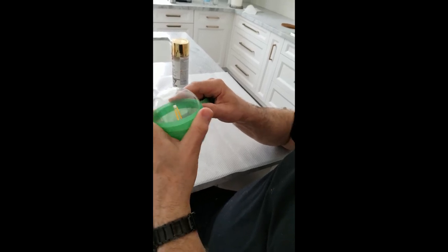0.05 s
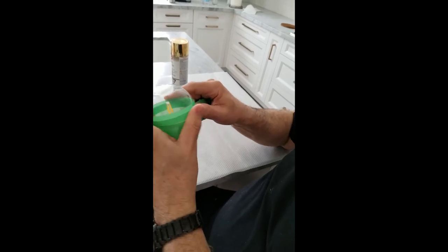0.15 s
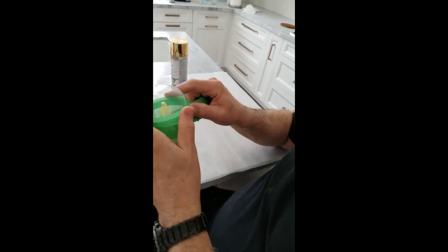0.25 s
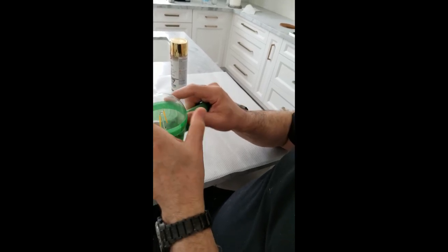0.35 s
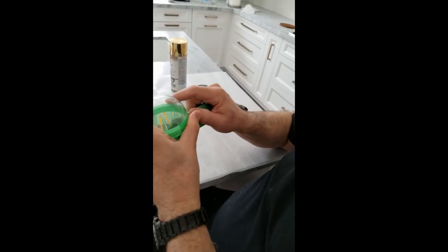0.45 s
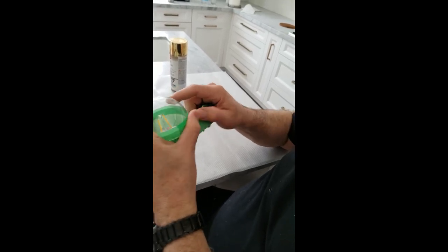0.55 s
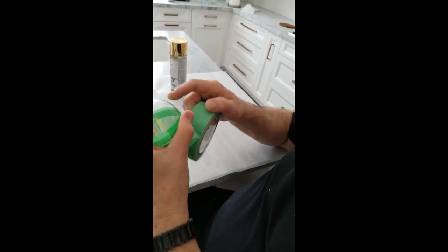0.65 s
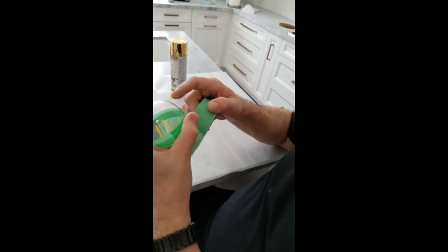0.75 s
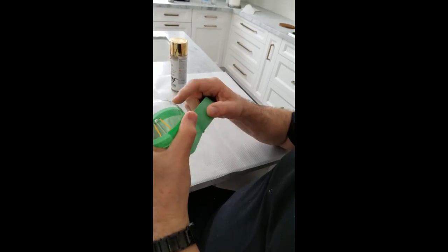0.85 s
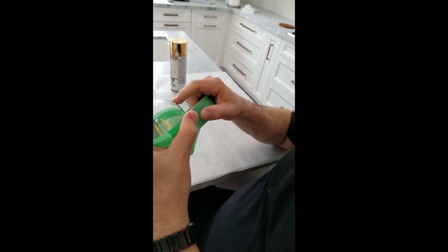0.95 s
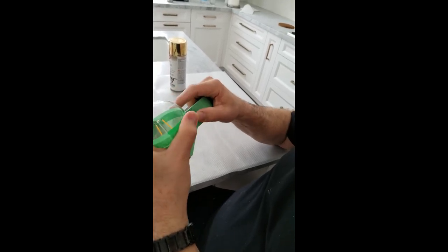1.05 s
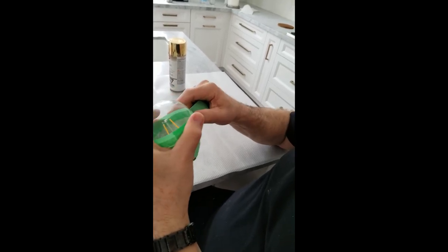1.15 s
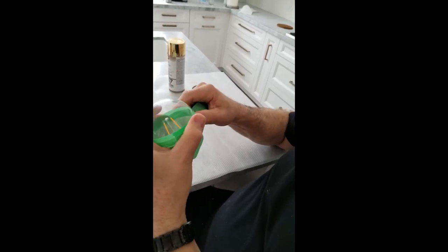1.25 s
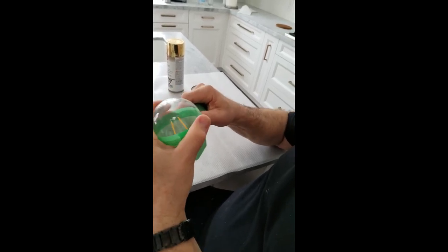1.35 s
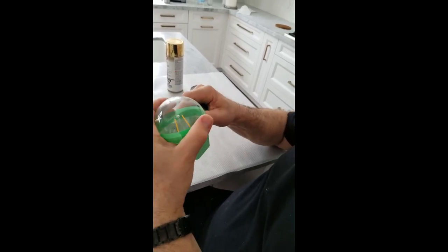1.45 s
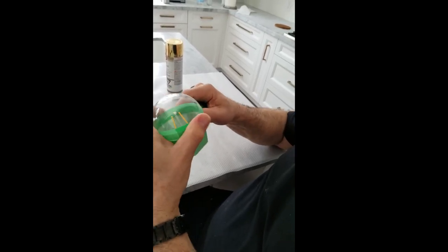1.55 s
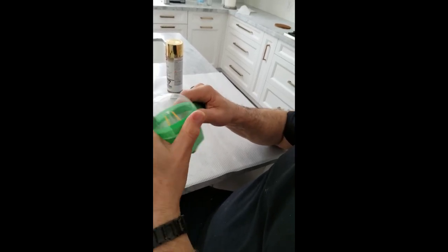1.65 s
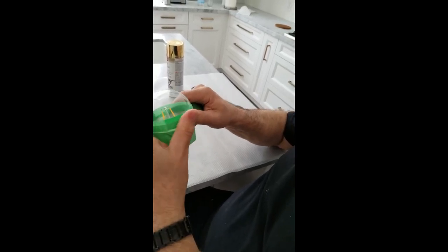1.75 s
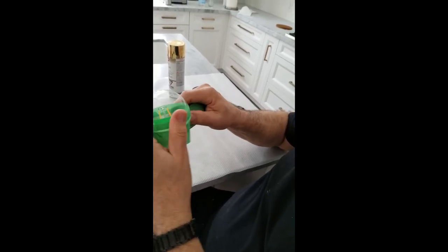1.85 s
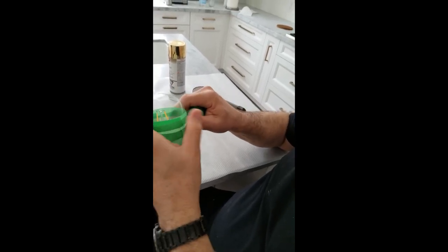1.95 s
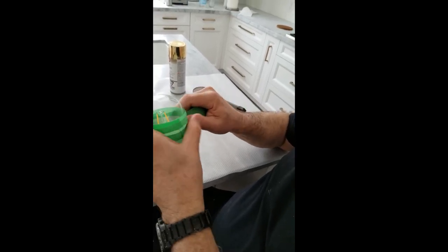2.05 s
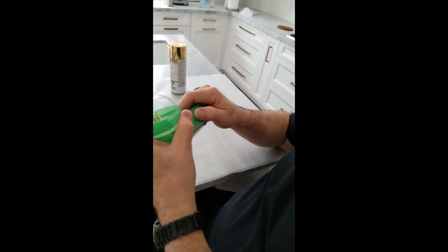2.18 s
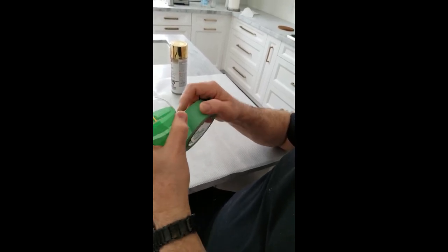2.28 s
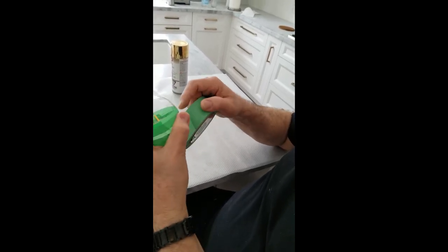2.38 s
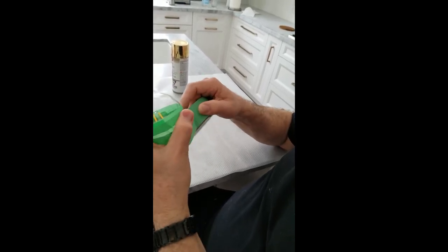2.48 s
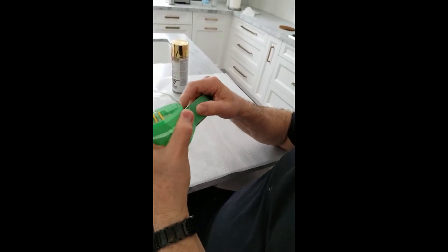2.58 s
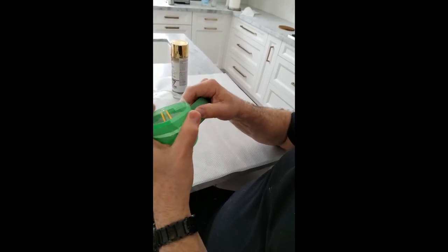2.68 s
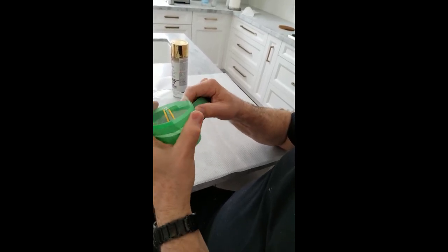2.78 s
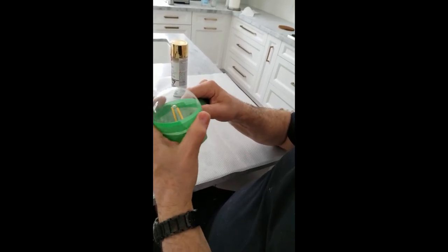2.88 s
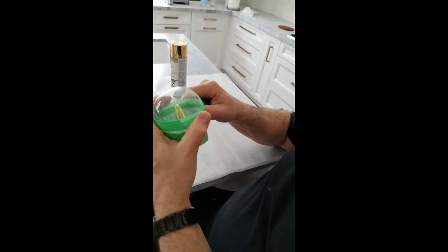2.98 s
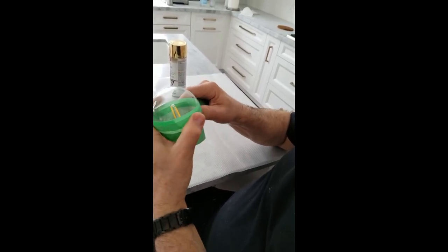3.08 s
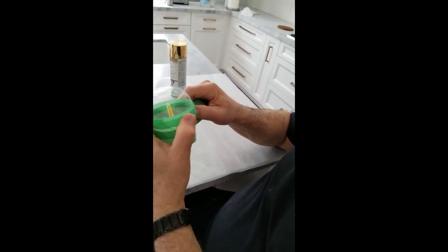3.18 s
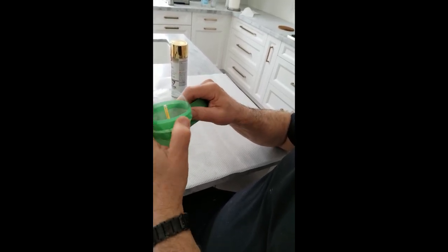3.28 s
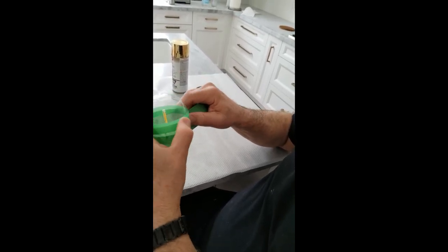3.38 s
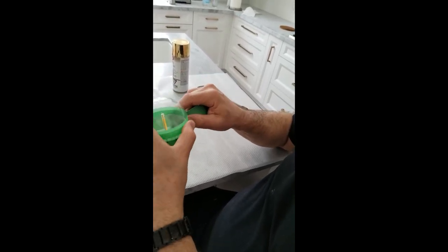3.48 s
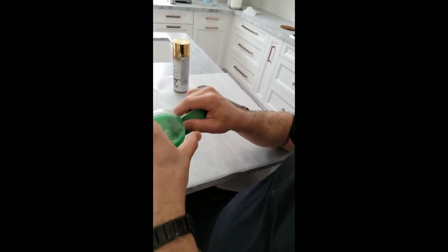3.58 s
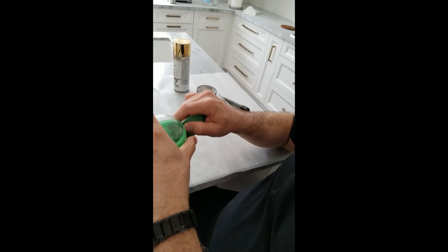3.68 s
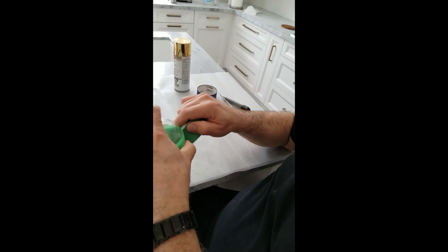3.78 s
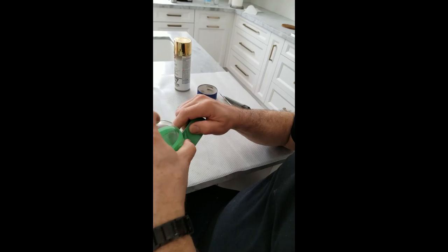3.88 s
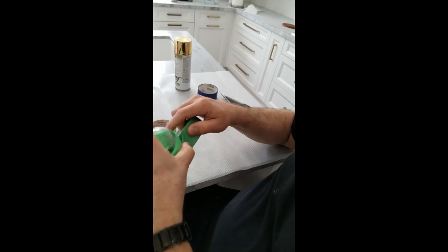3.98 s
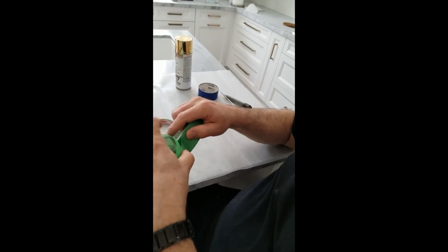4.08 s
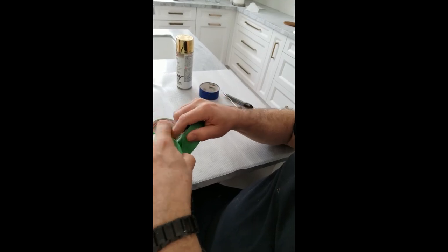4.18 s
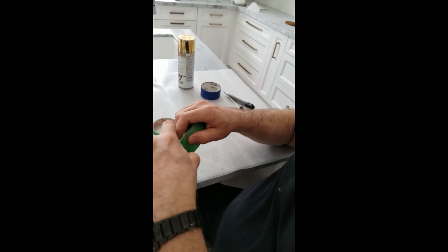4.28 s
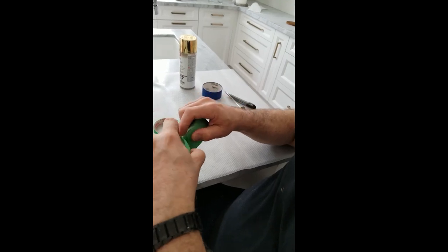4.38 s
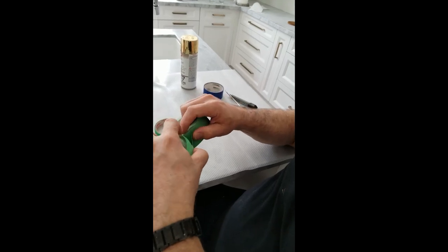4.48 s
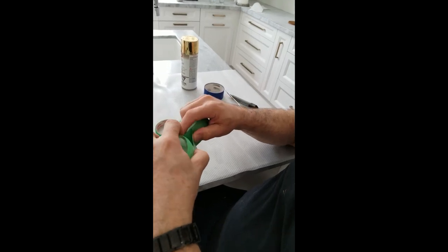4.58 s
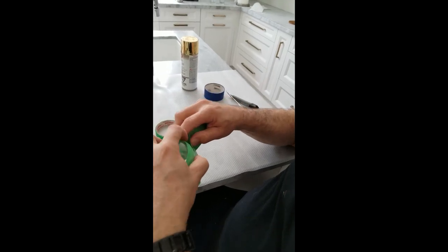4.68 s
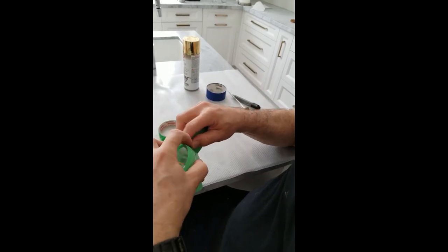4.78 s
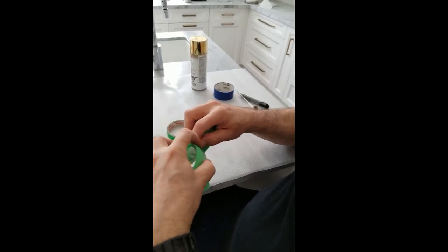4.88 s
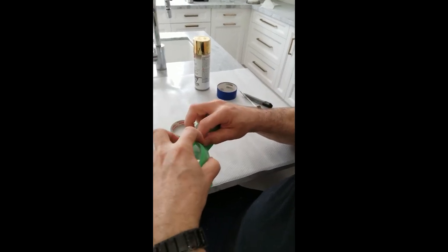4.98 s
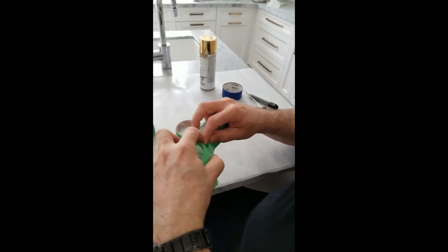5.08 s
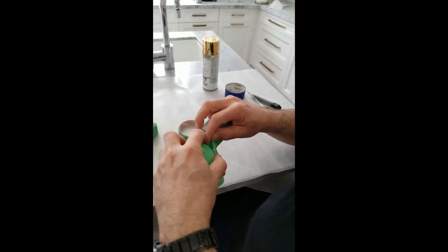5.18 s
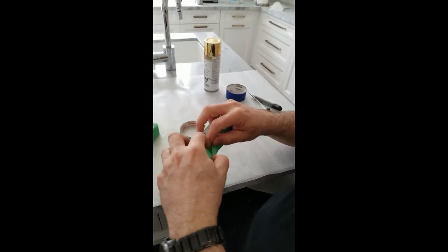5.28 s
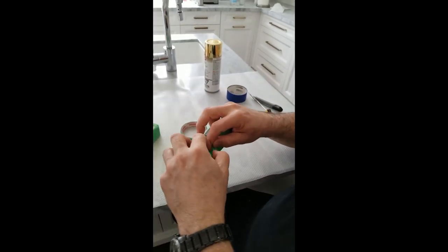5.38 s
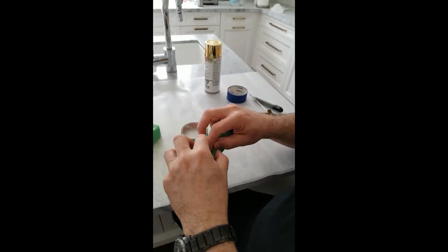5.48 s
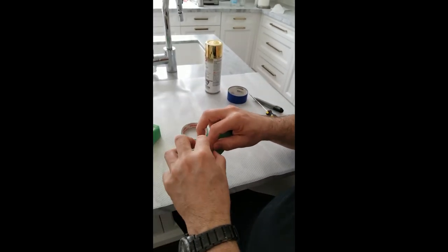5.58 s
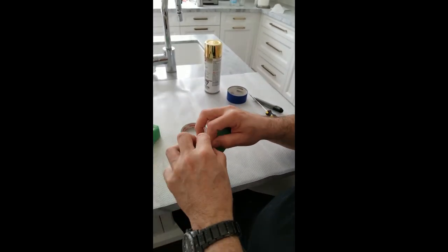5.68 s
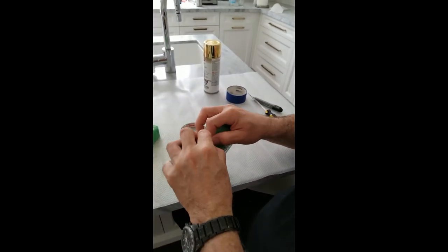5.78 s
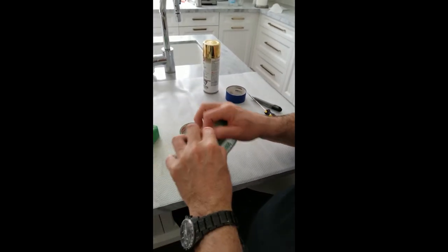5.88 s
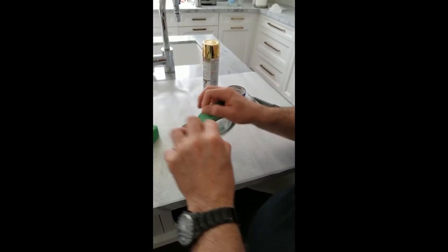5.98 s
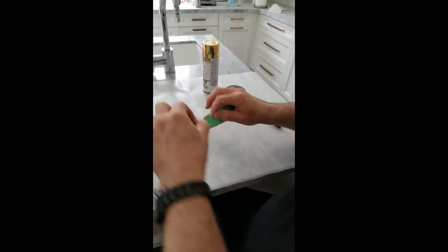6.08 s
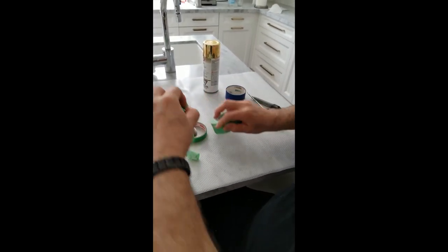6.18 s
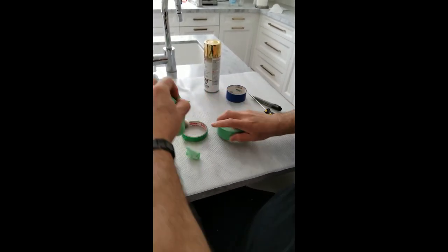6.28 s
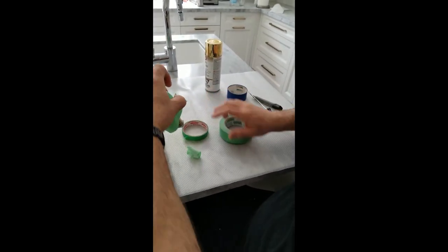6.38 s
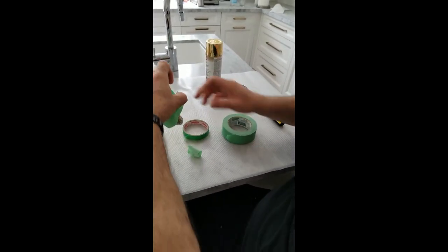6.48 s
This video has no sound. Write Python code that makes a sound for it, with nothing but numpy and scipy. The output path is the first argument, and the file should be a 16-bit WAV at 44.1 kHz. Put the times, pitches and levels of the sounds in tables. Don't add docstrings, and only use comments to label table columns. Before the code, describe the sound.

Close up in a hard-surfaced kitchen, paper tape is wrapped round a glass bulb: sharp glue snaps, a loud rasping pull, small crinkles and finger rubs, then two shorter pulls among crackling pops. Near the end the strip rips quickly and the roll thuds and wobbles on the counter. A faint fridge hum sits beneath; stereo microphone near the hands, slightly left.

```python
import sys
import numpy as np
from scipy import signal
from scipy.io import wavfile

SR = 44100
rng = np.random.default_rng(int(sys.argv[2]) if len(sys.argv) > 2 else 0)


def waveform_to_disk(signal):
    frames = np.transpose(np.atleast_2d(signal))
    scaled = np.clip(frames, -1, 1) * 32767
    samples = np.round(scaled).astype(np.int16)
    wavfile.write(sys.argv[1], SR, samples)


def attenuation_scalar(level_db):
    decades = np.asarray(level_db, float) / 20
    return 10 ** decades


N = 288414

# (time [s], left over right [dB])
HANDS = [(0.0, 3), (0.22, 4.5), (0.31, 3.5), (1.48, 2), (2.95, 4.5), (3.11, 2), (4.5, 1), (4.77, 0.0),
         (5.21, 1), (5.45, 1.5), (5.76, 3.5), (6.54, 5.5)]


def rms_one(x):
    return x / np.sqrt(np.mean(x ** 2) + 1e-20)


def in_time(rows, outside=None):
    s, *columns = np.transpose(rows)
    return [np.interp(np.arange(N) / SR, s, c, outside, outside) for c in columns]


def at_hz(points, hz):
    points_hz, values = np.transpose(points)
    return np.interp(np.log(hz), np.log(points_hz), values)


def band(x, low_hz, high_hz):
    return signal.sosfilt(signal.butter(2, [low_hz, high_hz], "band", fs=SR, output="sos"), x)


def peak(x, hz, width_hz):
    r = np.exp(-np.pi * width_hz / SR)
    zeros = [(1 - r * r) / 2, 0, (r * r - 1) / 2]
    return signal.lfilter(zeros, [1, -2 * r * np.cos(2 * np.pi * hz / SR), r * r], x)


def drift(rate):
    knots = rng.standard_normal(4000)
    return np.interp(np.arange(N) / SR * rate, np.arange(len(knots)), knots)


def pair(alike, size):
    mid, side = rng.standard_normal((2, size))
    alike = np.clip(alike, 0, 1)
    return np.sqrt((1 + alike) / 2) * mid + np.sqrt((1 - alike) / 2) * side * np.array([[1], [-1]])


def panned(x, pan_db):
    return x * attenuation_scalar(np.array([pan_db, -pan_db]) / 2).reshape(2, -1)


def placed(rows, *length_ms):
    at, pan_db = np.transpose(HANDS)
    return [(*row[:4], np.interp(row[0], at, pan_db), *row[4:], *length_ms) for row in rows]


def folds(clicks, modes):
    total = 0
    for k, (hz, width_hz, db) in enumerate(modes):
        gain = attenuation_scalar(db + 1.7 * drift(70) + 0.7 * drift(9))
        total = total + peak(clicks * gain, hz, width_hz) * (-1) ** k
    return rms_one(total)


def peel(rows, per_s, spread_db, clump_db, alike, strip):
    # (frequency [Hz], width [Hz], level [dB])
    roll_modes = [
        (700, 346, -0.5),
        (1500, 490, 3),
        (2300, 600, 0),
    ]
    # (frequency [Hz], width [Hz], level [dB])
    fibre_modes = [
        (7800, 1100, -0.5),
        (11670, 3200, 1),
        (15200, 1860, -1),
    ]
    level_db, dull_db, bright_db = in_time(rows)
    s = np.arange(N) / SR
    live = (s >= rows[0][0]) & (s <= rows[-1][0])
    sizes = attenuation_scalar(spread_db * np.minimum(rng.exponential(1, N), 5))
    sizes = sizes * (rng.random(N) < per_s / SR)
    clicks = sizes * attenuation_scalar(clump_db * (drift(150) + 0.19 * drift(40))) * pair(alike, size=N)
    dull = folds(clicks, roll_modes)
    body = band(folds(clicks, strip), 2000, 7600)
    bright = band(folds(clicks, fibre_modes), 6000, 21000)
    mix = body + attenuation_scalar(dull_db) * dull - attenuation_scalar(bright_db) * bright
    return panned(live * attenuation_scalar(level_db - 0.5) * mix, in_time(HANDS)[0])


def handling():
    # (time [s], level [dB])
    pulls = [
        [(0.66, -43), (0.75, -40.5), (0.868, -35), (0.96, -38.5), (1.034, -51), (1.07, -49), (1.11, -55.5),
         (1.15, -66)],
        [(2.27, -52), (2.35, -44.5), (2.453, -39.5), (2.47, -43), (2.53, -43.5), (2.565, -52)],
        [(4.151, -51), (4.25, -48), (4.347, -45.5), (4.377, -48), (4.49, -45), (4.505, -50)],
    ]
    # (dull part [dB], bright part [dB])
    pull_colours = [
        (-5.5, -3.5),
        (-3.5, -1),
        (-4, -6),
    ]
    # (time [s], level [dB], time to fall 20 dB [s], dull [dB], bright [dB])
    tails = [(0.272, -45, .1, -12, -2), (0.45, -43.5, .19, -8, 5), (1.172, -51.5, .15, -2, 0),
             (1.634, -48, .15, -12, -10), (1.688, -51, .12, -3, -1), (2.062, -42, .1, -12, -2),
             (2.1, -39.5, .16, -3, -5), (2.906, -59, .06, -12, -15), (3.29, -49, .2, -4, -2),
             (3.712, -50, .18, -3, -1), (3.798, -45.5, .25, -3, -12), (3.834, -45, .12, -4, -1),
             (4.01, -52, .14, -1, 3), (4.501, -37.5, .24, -7, 0), (5.05, -46.5, .085, -4, 3),
             (5.129, -48.5, .12, -5, 0), (5.468, -52.5, .27, -2, -13), (5.709, -58.5, .3, -6, -6),
             (6.285, -46, .05, -6, -4), (6.18, -50, .1, -15, 4), (6.212, -41, .16, -5, -2),
             (6.36, -39, .13, -8, 0)]
    # (top [s], level [dB], time to rise 20 dB [s], time to fall 20 dB [s], bright part [dB])
    rustles = [(0.0, -60, .1, .5, -12), (0.156, -53, .15, .16, -6), (0.409, -51.5, .25, .1, -8),
               (0.65, -54, .6, .05, -2), (1.38, -57.5, .4, .2, -13), (1.536, -52.5, .055, .07, 1),
               (1.732, -53, .1, .08, -2), (1.86, -59.5, .03, .06, 2), (2.05, -57.5, .08, .05, -6),
               (2.25, -56, .08, .1, 0), (2.63, -52, .3, .3, -3.5), (2.71, -58, .3, .12, -3.5),
               (3.13, -54, .06, .24, -4), (3.595, -57.5, .06, .5, -5), (3.69, -59, .3, .05, -9),
               (4.68, -52, .3, .05, -6), (4.833, -63, .05, .04, -6), (5.035, -66, .35, .03, -1),
               (5.38, -58, 1.5, .2, -1), (6.05, -60, .2, .4, 2), (6.17, -58, .1, .03, -5),
               (6.47, -52, .2, .3, -10), (6.54, -43, .07, .1, -13)]
    # (level [dB], dull part [dB], bright part [dB])
    idle = (-80, -3, 0)
    pull_edge_s, tail_rise_s = 0.01, 0.008
    s = np.arange(0, N + 88, 44) / SR
    moves = [(idle[0] + 0 * s, *idle[1:])]
    for rows, colour in zip(pulls, pull_colours):
        at, db = np.transpose(rows)
        outside_s = np.clip(np.maximum(at[0] - s, s - at[-1]), 0, None)
        moves.append((np.interp(s, at, db) - 20 * outside_s / pull_edge_s, *colour))
    for at, db, fall, dull_db, bright_db in tails:
        level_db = db - 20 * np.maximum((at - s) / tail_rise_s, (s - at) / fall)
        moves.append((level_db, dull_db, bright_db - 20 * 0.15 * np.clip(s - at, 0, None) / fall))
    for at, db, rise, fall, bright_db in rustles:
        moves.append((db - 20 * np.maximum((at - s) / rise, (s - at) / fall), -8, bright_db))
    power = 0
    for db, dull_db, bright_db in moves:
        power = power + attenuation_scalar(2 * (db + np.array([0 * s, dull_db + 0 * s, bright_db + 0 * s])))
    body, dull, bright = 10 * np.log10(power)
    return np.transpose([s, body, dull - body, bright - body])


def wrapping():
    # (frequency [Hz], width [Hz], level [dB])
    tape_modes = [
        (3620, 1150, 3),
        (4730, 2800, 4),
        (5870, 2950, 1),
    ]
    return peel(handling(), 7000, spread_db=0.0, clump_db=0.5, alike=0.13, strip=tape_modes)


def tearing():
    # (time [s], level [dB], dull part [dB], bright part [dB])
    tear = [
        (5.841, -36, -14, 2),
        (5.864, -34, -4, -1),
        (5.884, -30, -6, 1),
        (5.9, -34, -6, 1),
        (5.917, -39, -9, -1),
        (5.975, -50, -6, -2),
        (6.04, -64, -5, -5),
    ]
    # (frequency [Hz], width [Hz], level [dB])
    taut_modes = [
        (3100, 1500, 1.5),
        (4900, 2600, 4),
        (6400, 2600, 4),
    ]
    return peel(tear, 14000, spread_db=-0.5, clump_db=0.9, alike=0.16, strip=taut_modes)


def snaps(rows, ring_share, spike, lift_db):
    size = 1500
    out = np.zeros((2, N + size))
    for s, peak_db, hz, bright_db, pan_db, length_ms in rows:
        t = np.arange(size) / SR / (np.clip(length_ms, .3, 8) / 2000)
        shape = t ** 2 * np.exp(-t * 1.37)
        burst = pair(0.058, size=size) * shape / shape.max()
        burst[[0, 1], np.argmax(shape) + rng.integers(0, 5, 2)] += spike
        upper_hz = min(hz * rng.uniform(1.25, 2.1), 15000)
        ring = peak(burst, hz, ring_share * hz)
        ring = ring - attenuation_scalar(-9) * peak(burst, upper_hz, ring_share * upper_hz)
        ring = ring + attenuation_scalar(-10) * band(burst, hz / 1.53, min(hz * 2.06, 20000))
        parts = [ring, band(burst, 314, 1320), band(burst, 7000, 18700)]
        body, dull, bright = [p / np.abs(p).max() for p in parts]
        mix = body + attenuation_scalar(-25) * dull + attenuation_scalar(bright_db) * bright
        at = max(round((s - 0.00025 * length_ms) * SR), 0)
        out[:, at:at + size] += panned(attenuation_scalar(peak_db + lift_db) * mix, pan_db)
    return out[:, :N]


def creasing():
    # (time [s], peak [dB], ring [Hz], bright part [dB], length [ms])
    loud_snaps = [(0.149, -24, 3640, -5, 1.38), (0.2661, -23, 4100, -3, 2.6), (0.3033, -28, 3500, -7, 1.5),
                  (0.4403, -13, 3860, 3, 2.3), (0.5524, -30, 3860, -13, 2.1),
                  (1.685, -31.5, 4470, -16, 2.45), (2.0577, -24.5, 3300, -24, 2.4),
                  (2.102, -19, 4320, -1, 3.04), (3.2834, -21, 4100, -2, 1.57),
                  (3.7068, -23.5, 4000, -1, 3.2), (3.828, -19.5, 5230, -9, 2.16),
                  (3.8624, -24, 3280, 0, 1.9), (4.0046, -24, 3400, 0, 3.5), (4.1483, -29.5, 3300, -8, 1.76),
                  (4.4975, -17.5, 3660, -4, 2.17), (4.5254, -22.5, 3800, -21, 2.4),
                  (5.0437, -23.5, 5900, -2, 3), (5.1295, -30, 1850, 4, 1.04), (5.1525, -25, 3580, -2, 1.64),
                  (5.4613, -20.5, 4300, -26, 1.6), (6.1762, -18, 7000, 4, 1.4),
                  (6.2079, -21, 4650, 1, 2.06), (6.2832, -33, 2300, -5, 1.9),
                  (6.355, -19.5, 3940, -3, 1.94)]
    # (time [s], peak [dB], ring [Hz], bright part [dB])
    middle_snaps = [(0.4022, -29, 4400, -9), (0.6598, -32, 4050, 1), (1.1637, -36, 6600, -7),
                    (1.1732, -36, 4650, 4), (1.3932, -33.5, 1480, -20), (1.6401, -32.5, 4200, -14),
                    (1.8496, -35.5, 6400, -7), (2.1874, -32, 2800, -9), (2.2183, -30.5, 4900, 1),
                    (2.6387, -30, 4420, -10), (2.9076, -35, 4500, -15), (3.7013, -31.5, 1720, 1.5),
                    (3.7981, -31.5, 3270, -11), (3.9248, -29, 2930, -14), (4.2186, -33.5, 1980, -6),
                    (4.6965, -35.5, 1570, -14), (4.7195, -34.5, 3860, -23), (5.5665, -35, 4530, 0.5),
                    (5.7082, -34.5, 4550, -4), (6.0866, -38, 6900, -2), (6.1635, -40, 5830, -6),
                    (6.4648, -31.5, 3120, -12)]
    # (time [s], peak [dB], ring [Hz], bright part [dB])
    ticks = [(0.2027, -40, 3400, -4), (0.2379, -43, 3800, -3), (1.19, -42, 1500, -10),
             (1.3218, -46, 7900, -10), (1.4115, -45, 1600, -25), (1.425, -45, 5500, -15),
             (1.5149, -47, 1480, -6), (1.728, -40, 4000, -6), (1.8814, -45.5, 5870, 13.5),
             (2.0153, -40.5, 3560, -18), (2.6088, -42, 4170, -17), (3.1321, -39, 3600, -17),
             (3.3132, -37, 3850, -24), (3.3616, -44, 1500, -18), (3.595, -41, 2730, -22),
             (5.064, -34, 6500, -8), (5.6209, -50, 1870, 11), (5.6334, -47, 3400, 19),
             (6.0542, -38.5, 2830, -25), (6.1176, -39, 5960, 1)]
    # (time [s], peak [dB], ring [Hz], bright part [dB])
    more_snaps = [(0.1366, -37, 3600, -7), (0.2662, -25, 6000, -4), (0.2714, -23, 3850, -10),
                  (0.3114, -33, 1500, -12), (0.3118, -33, 3900, -12), (0.4132, -38, 3830, -10),
                  (0.8375, -26, 7500, -2), (0.8934, -28, 4720, -6), (0.9228, -28, 4110, -4),
                  (1.8312, -47, 7230, 0), (1.8584, -40, 6280, -5), (2.0724, -32, 5590, -1),
                  (2.078, -35, 7000, 0), (2.317, -34, 7940, -3), (2.3952, -29, 4090, -12),
                  (2.4587, -17.5, 5200, -8), (2.4914, -31, 4500, -10), (2.531, -31, 4130, -10),
                  (2.7894, -45, 4280, -8), (2.991, -54, 10000, 0), (3.0972, -49, 6000, 1),
                  (3.5062, -50, 5500, 0), (3.5613, -54, 2150, -3), (3.8026, -31, 3550, -12),
                  (3.8068, -35, 3530, -10), (3.8488, -31, 9000, 2), (3.87, -30, 3800, -4),
                  (3.9984, -41, 4500, -10), (4.018, -31, 3310, -10), (4.1039, -48, 8300, -12),
                  (4.1672, -42, 11000, 0), (4.7289, -44, 7500, -5), (4.8272, -43, 5340, -6),
                  (5.0604, -34, 5770, -4), (5.8842, -20, 2900, -4), (6.2877, -31, 4200, -8),
                  (6.2936, -34, 4200, -7), (6.3552, -21, 6200, -3), (6.5334, -34, 4470, -6)]
    # (time [s], peak [dB], ring [Hz], bright part [dB])
    clumps = [(0.7562, -23.5, 3550, -5), (0.7875, -23, 1480, 1), (0.8355, -20, 2600, -10),
              (0.8577, -22, 3800, -1.5), (0.9403, -16, 4900, -8), (0.995, -27.5, 5250, -16),
              (1.071, -26.5, 4870, -17), (2.3546, -24.5, 4200, -20), (2.4194, -22, 4520, -12),
              (2.461, -24, 5500, -10), (2.5127, -23, 4370, -20), (5.842, -20, 5130, -12),
              (5.8643, -22, 3530, -12), (5.8836, -21, 2920, -15)]
    middle_ms, tick_ms, more_ms, clump_ms = 2.3, 2.1, 2.2, 4.5
    sharp = placed(loud_snaps) + placed(middle_snaps, middle_ms)
    sharp += placed(ticks, tick_ms) + placed(more_snaps, more_ms)
    single = snaps(sharp, ring_share=0.14, spike=6.63, lift_db=2.8)
    return single + snaps(placed(clumps, clump_ms), ring_share=0.084, spike=2.9, lift_db=-1)


def rubs():
    # (start [s], end [s], pitch [Hz], width [Hz], level [dB])
    drags = [(0, 0.143, 5000, 300, -61), (0.66, 0.745, 2520, 500, -45.5), (0.97, 1.102, 4720, 600, -49),
             (1.33, 1.41, 3900, 400, -64), (1.47, 1.76, 1450, 300, -66), (2.33, 2.564, 4430, 700, -47.5),
             (2.47, 2.72, 14000, 1200, -59), (3.364, 3.43, 850, 700, -54), (3.364, 3.43, 1900, 900, -62),
             (4.012, 4.13, 3100, 1000, -54), (4.203, 4.333, 2100, 450, -50), (6.27, 6.31, 2160, 500, -46.5)]
    out, s = 0, np.arange(N) / SR
    slips = pair(0.35, size=N) * attenuation_scalar(1.4 * drift(90))
    for start, end, hz, width_hz, level_db in drags:
        stroke = np.sqrt(np.clip(4 * (s - start) * (end - s), 0, None)) / (end - start)
        pitched = peak(peak(slips, hz, width_hz), hz, 2 * width_hz)
        out = out + attenuation_scalar(level_db) * stroke * rms_one(pitched)
    return out


def counter():
    # (time [s], peak [dB], upper modes [dB])
    knocks = [(0.44, -42, 6), (0.939, -49, 5.5), (2.102, -40, 1), (2.921, -42, -27), (3.363, -52, 8),
              (4.5, -51, -8), (4.696, -47, 0), (5.152, -52, 2), (6.209, -32, -8), (6.215, -34, -6),
              (6.229, -31, -14), (6.25, -31, -18), (6.288, -37, -16), (6.389, -46, -25), (6.421, -45, -25),
              (6.468, -46, -25)]
    # (frequency [Hz], level [dB], decay by 60 dB [s])
    slab_modes = [(77.4, -24, .1), (120, -26, .1), (191.6, 3.5, 0.03), (265, 2, 0.042), (350, -2, 0.022),
                  (420.5, -5.5, 0.12), (500, 5, 0.045), (546, 1, 0.051), (700, 5.5, 0.018),
                  (870, 0.5, 0.013), (1384, 6, 0.011)]
    # (time [s], level [dB])
    wobble = [
        (6.204, -46),
        (6.214, -32.5),
        (6.36, -48),
        (6.374, -57),
        (6.392, -47),
        (6.54, -44),
    ]
    s, peak_db, upper_db = np.transpose(knocks)
    at, out = np.round(s * SR).astype(int), np.zeros((2, N))
    rocking_db = in_time(wobble, outside=-200)[0] - 30 + 2.2 * drift(60)
    rocking = attenuation_scalar(rocking_db) * pair(0.89, size=N)
    for hz, level_db, t60 in slab_modes:
        upper, middle = hz > 640, hz > 400
        push = rocking * attenuation_scalar(-14 * upper - 4 * middle)
        uneven_db = rng.normal(0, 2.2, (len(at), 2)).T
        upper_share = upper or .25 * middle
        push[:, at] += attenuation_scalar(peak_db - 2 + upper_share * upper_db + uneven_db) * (-1) ** round(hz)
        r, w = attenuation_scalar(-60 / (t60 * SR)), 2 * np.pi * hz / SR
        out += attenuation_scalar(level_db) * signal.lfilter([0, np.sin(w)], [1, -2 * r * np.cos(w), r * r], push)
    return band(out, 95, 1400)


def kitchen(x):
    # (frequency [Hz], decay by 60 dB [s])
    room_t60 = [
        (300, 0.6),
        (900, 0.46),
        (2700, 0.49),
        (6500, 0.37),
        (12000, 0.073),
    ]
    t, tail = np.arange(SR // 2) / SR, 0
    for hz, t60 in room_t60:
        diffuse = band(pair(.1, size=len(t)), hz / 1.415, min(hz * 1.32, 18000))
        tail = tail + diffuse * attenuation_scalar(-60 * t / t60)
    tail = tail * np.clip(t / 0.0072 - .3, 0, 1)
    tail = attenuation_scalar(-9) * tail / np.sqrt(np.sum(tail ** 2) / 2)
    echo_s, echo_db = 0.0085, -15
    tail[:, round(echo_s * SR)] += attenuation_scalar(echo_db)
    return signal.fftconvolve(x.mean(axis=0)[None], tail, axes=1)[:, :N]


def background():
    # (frequency [Hz], likeness [0-1])
    likeness = [
        (30, .3),
        (70, .4),
        (125, 1),
        (250, 0.85),
        (600, 0),
        (2000, 0),
        (12000, 0.02),
    ]
    # (frequency [Hz], level [dB per Hz])
    air = [(15, -49), (25, -9), (102, -5), (161, -5), (236, 4), (317, -3.5), (591, -10), (887, -17),
           (1160, -17.5), (2600, -37.5), (3920, -24.5), (13200, -36), (16000, -43)]
    # (frequency [Hz], width [Hz], level [dB])
    hum = [
        (68, 10, -71),
        (92.2, 6, -74.5),
        (120.2, 1.3, -67.5),
        (188.2, 23, -68),
        (238.7, 8, -61),
        (373, 15, -79),
        (499, 8, -76.5),
        (881, 9.2, -79),
    ]
    out, edges = 0, 22 * 2 ** np.arange(0, 9.8, .5)
    white = rng.standard_normal((2, 2, N))
    for k, (low, high) in enumerate(zip(edges, edges[1:])):
        centre = np.sqrt(low * high)
        alike = np.clip(at_hz(likeness, centre), 0, 1)
        mid, side = band(white[k % 2], low, high)
        both = np.sqrt(1 + alike) * mid + np.sqrt(1 - alike) * side * np.array([[1], [-1]])
        out = out + attenuation_scalar(at_hz(air, centre) + 0.9 * drift(6)) * both
    steady, waver = 2 * np.pi * np.arange(N) / SR, pair(.6, size=N)
    lead = np.array([[0], [.8]])
    lines = 0
    for hz, width_hz, db in hum:
        tone = 1.645 * np.sin(hz * steady + lead * (hz < 100))
        lines = lines + attenuation_scalar(db) * (rms_one(peak(waver, hz, width_hz)) + tone)
    return attenuation_scalar(-56) * rms_one(out) + lines


def scene():
    near = wrapping() + tearing() + creasing() + rubs() + counter()
    return near + kitchen(near) + background()


def top_cut(x):
    return signal.sosfilt(signal.butter(12, 16990, fs=SR, output="sos"), x)


def record(dry):
    thin = signal.sosfilt(signal.butter(2, 45, "high", fs=SR, output="sos"), dry)
    cut = signal.sosfilt(signal.ellip(8, .5, 38, 15900, fs=SR, output="sos"), thin)
    return top_cut(cut)


dry = scene()
out = record(dry)
waveform_to_disk(out)
```